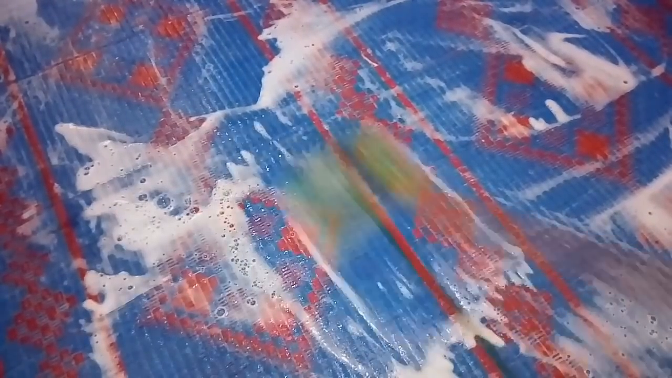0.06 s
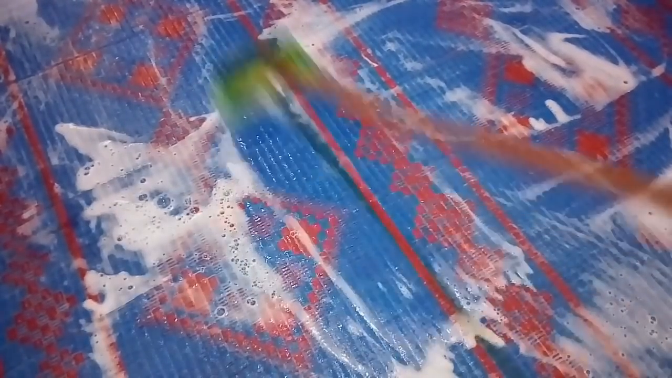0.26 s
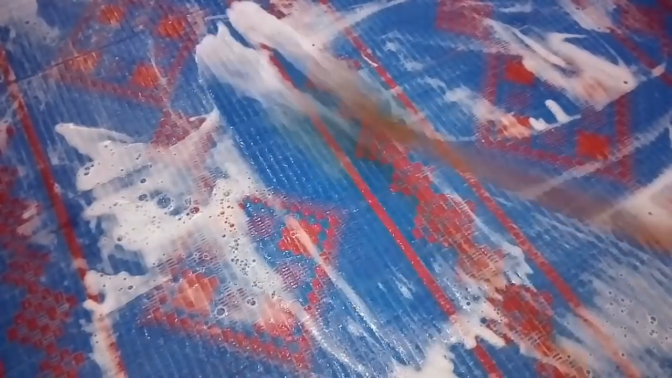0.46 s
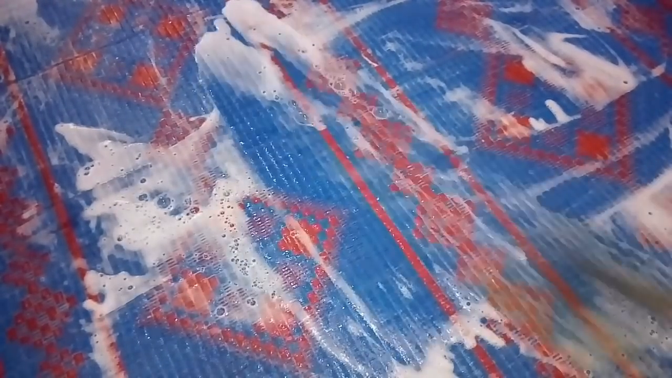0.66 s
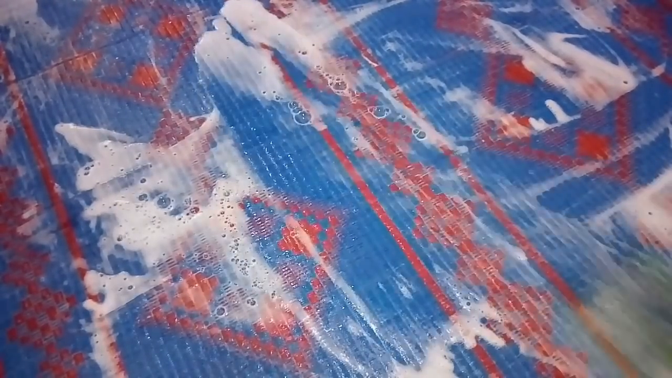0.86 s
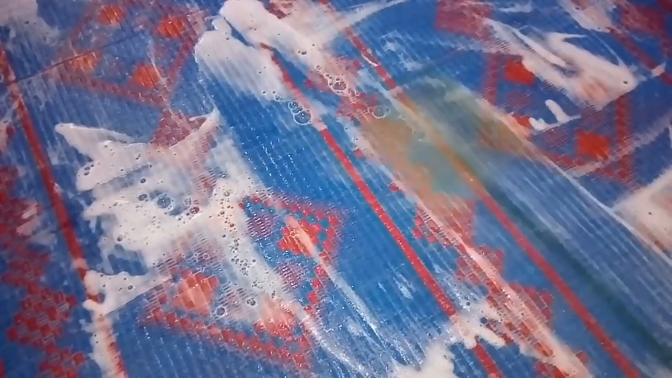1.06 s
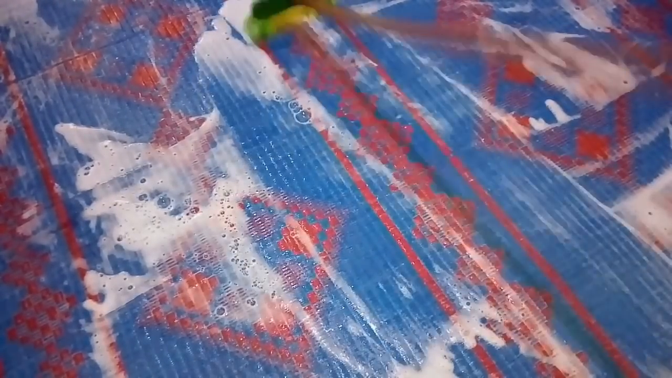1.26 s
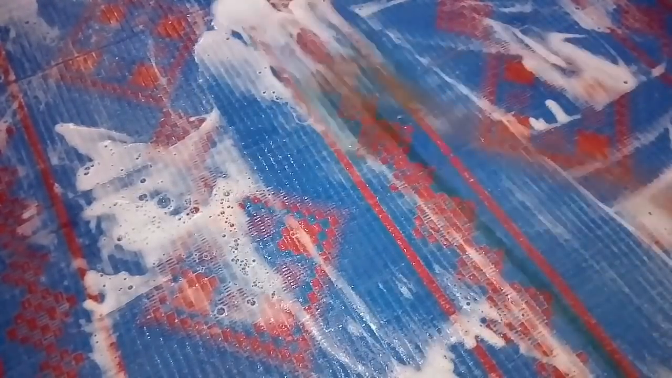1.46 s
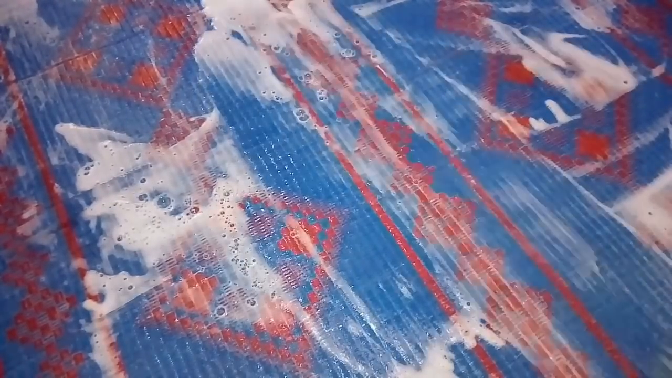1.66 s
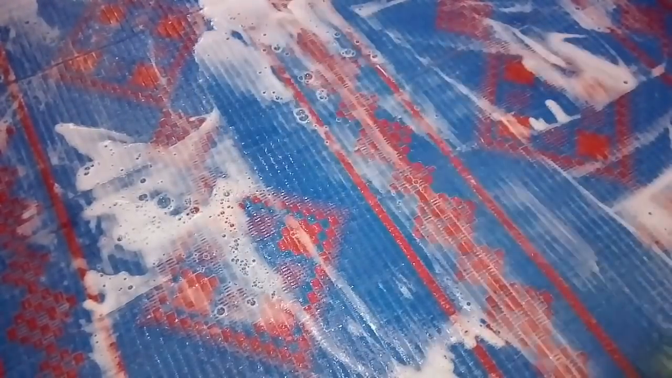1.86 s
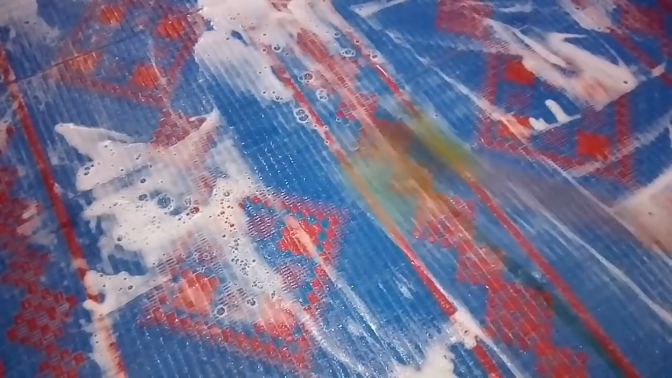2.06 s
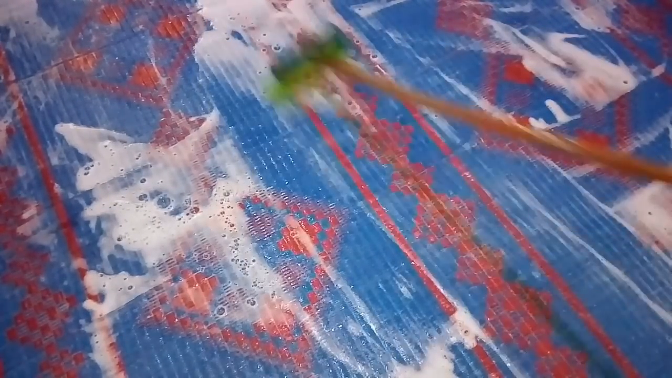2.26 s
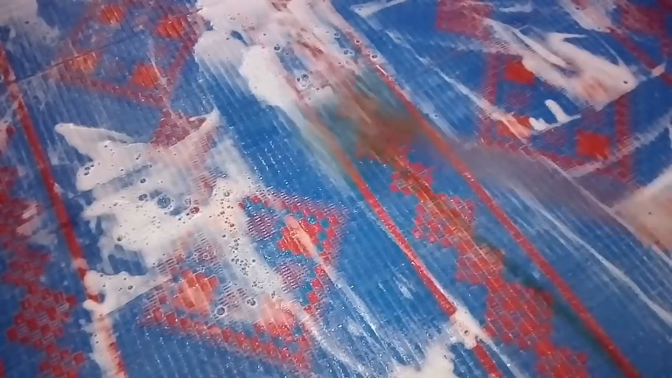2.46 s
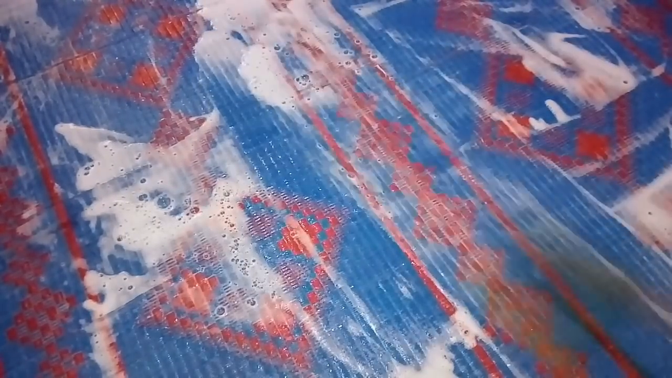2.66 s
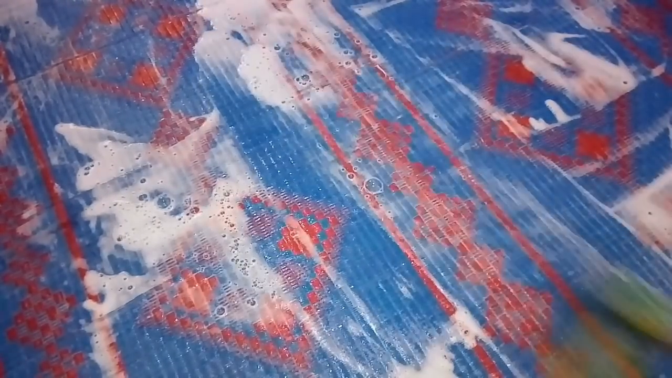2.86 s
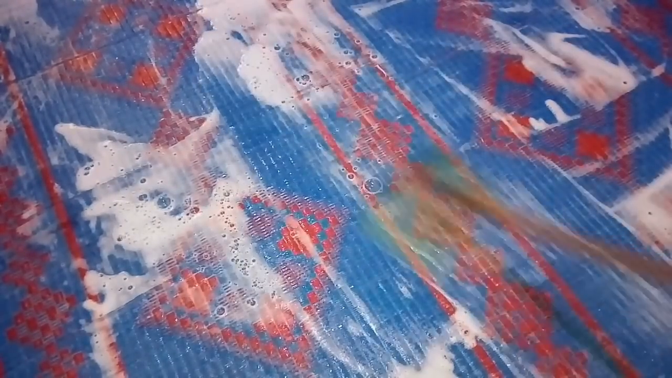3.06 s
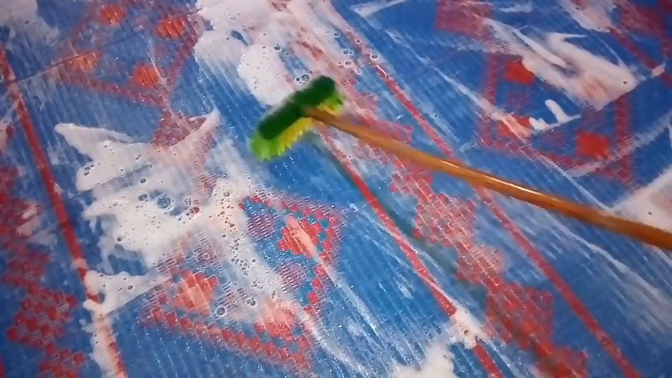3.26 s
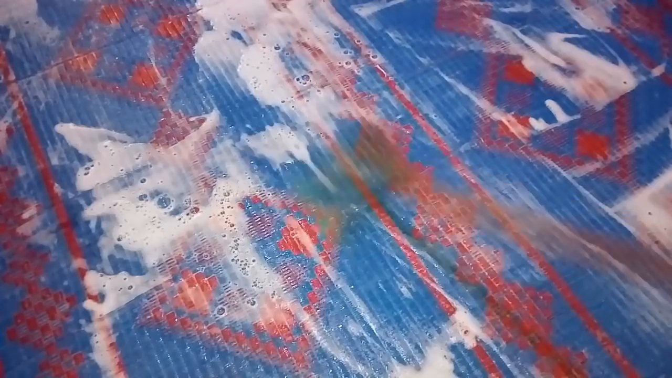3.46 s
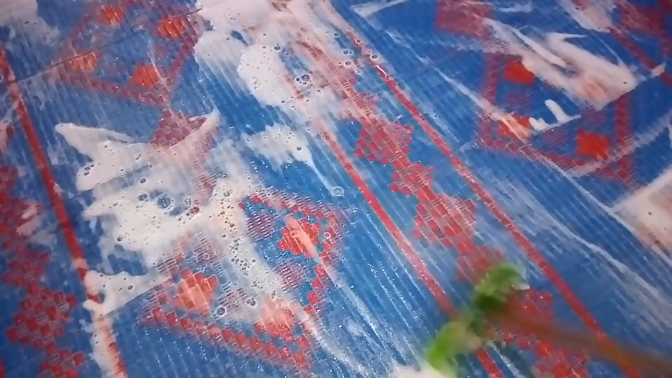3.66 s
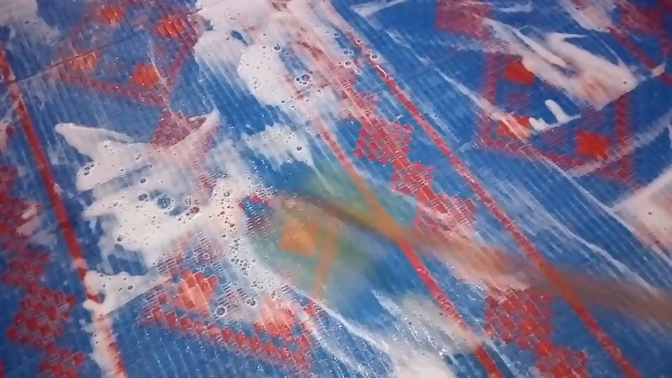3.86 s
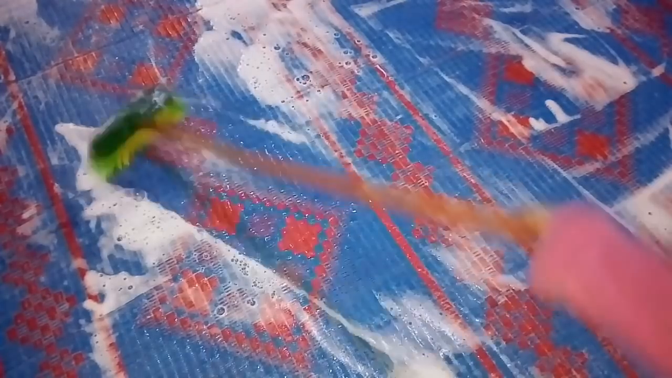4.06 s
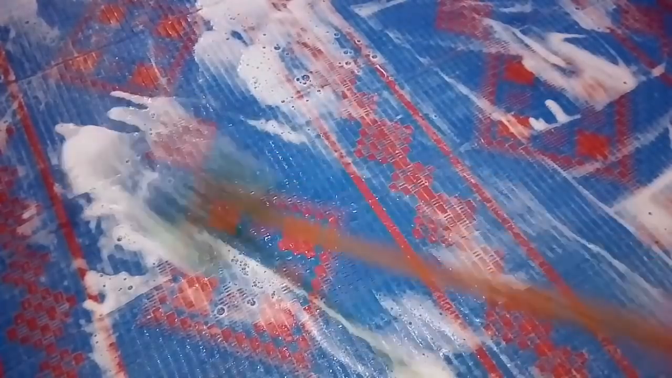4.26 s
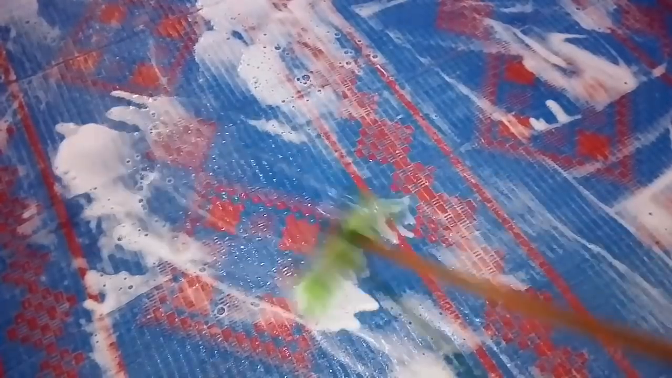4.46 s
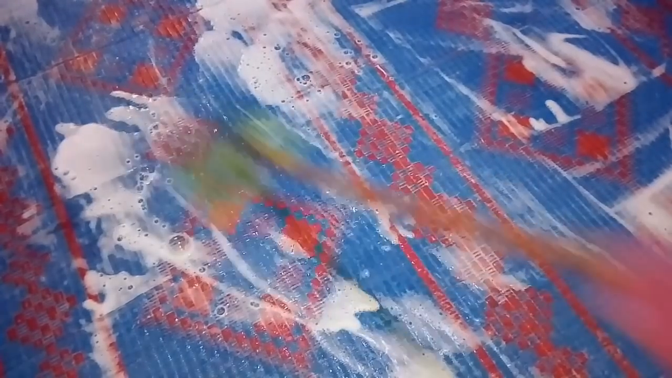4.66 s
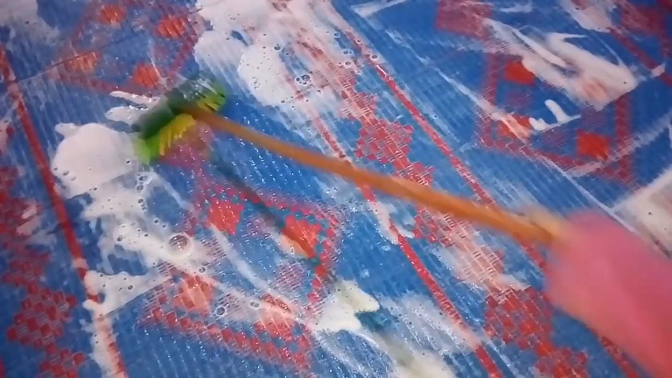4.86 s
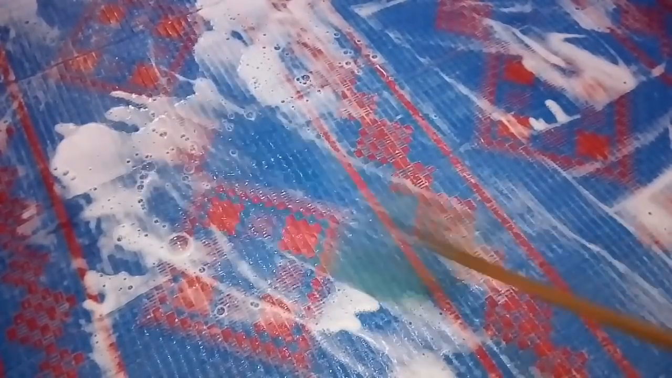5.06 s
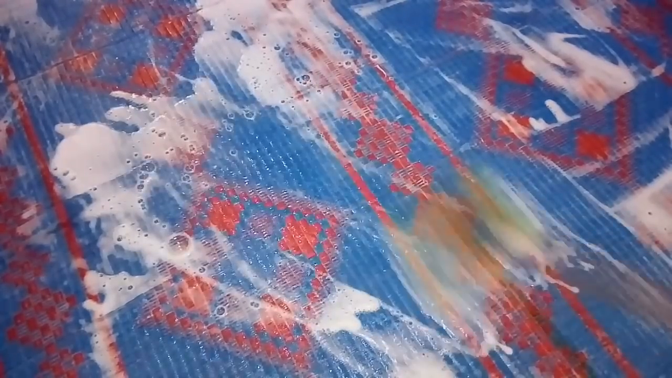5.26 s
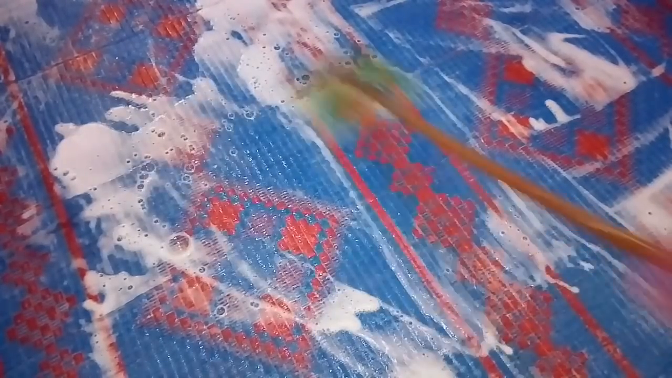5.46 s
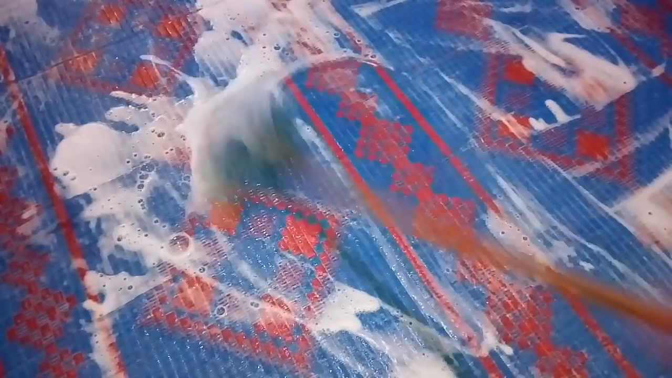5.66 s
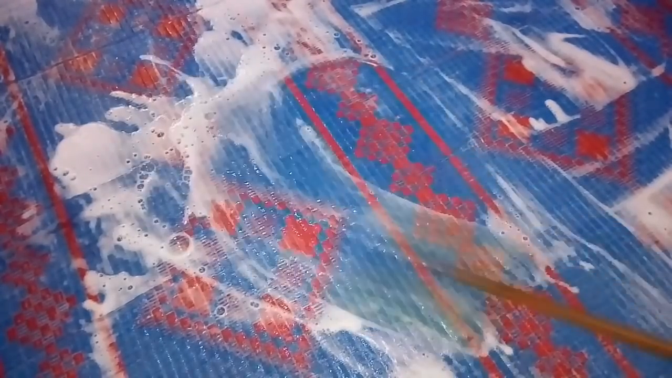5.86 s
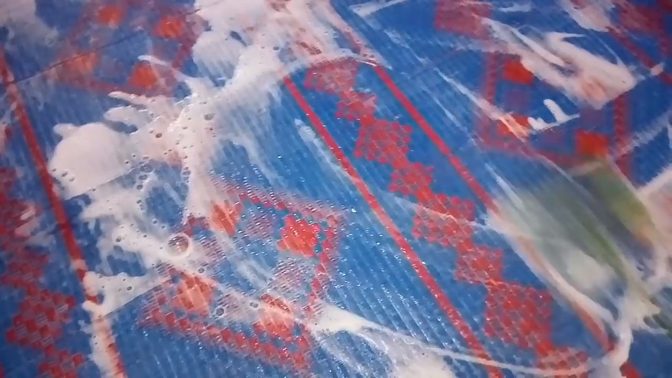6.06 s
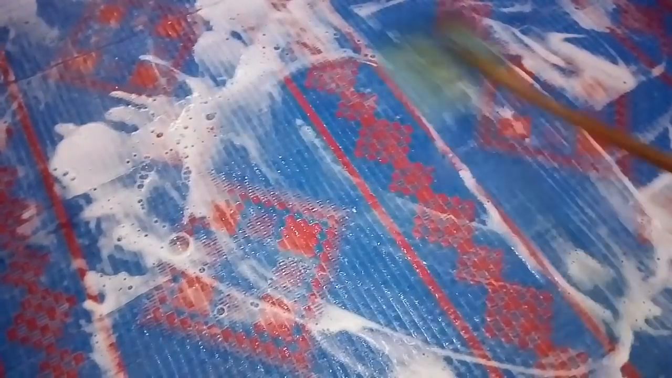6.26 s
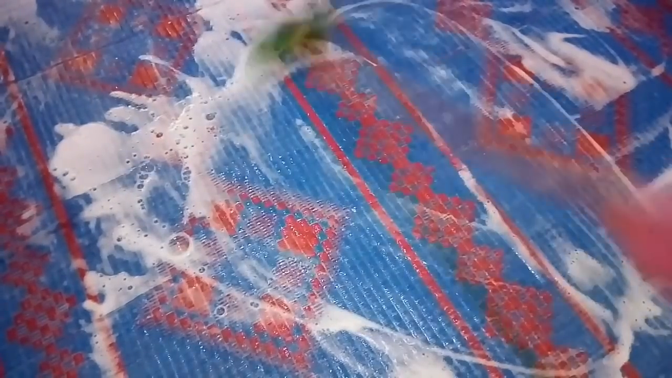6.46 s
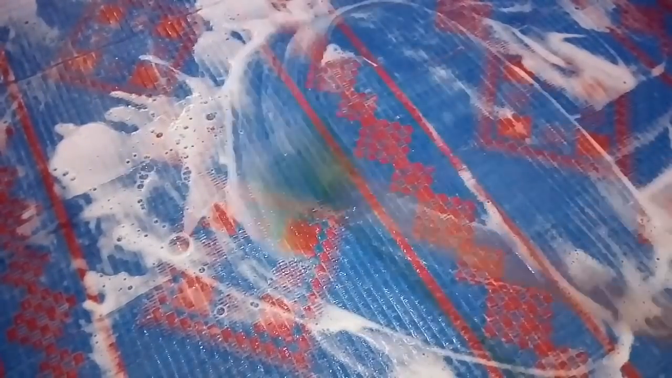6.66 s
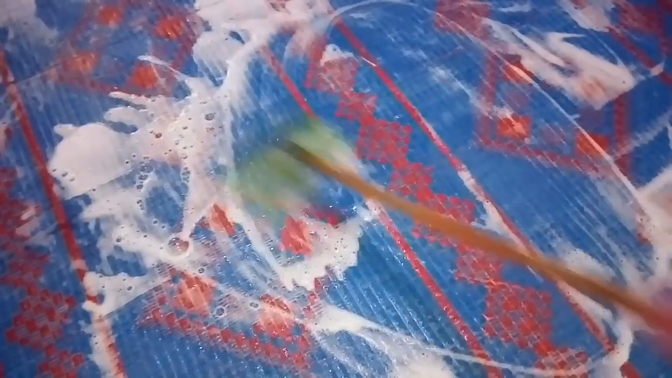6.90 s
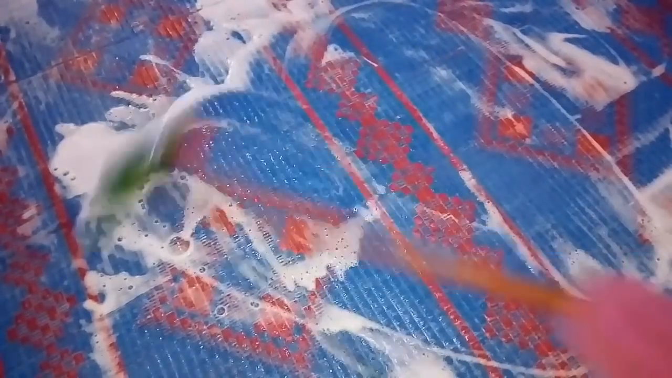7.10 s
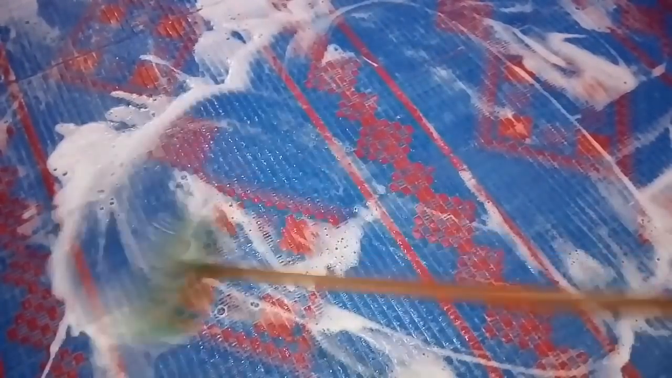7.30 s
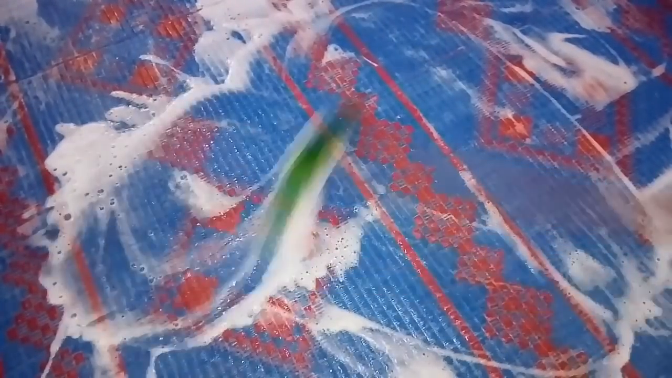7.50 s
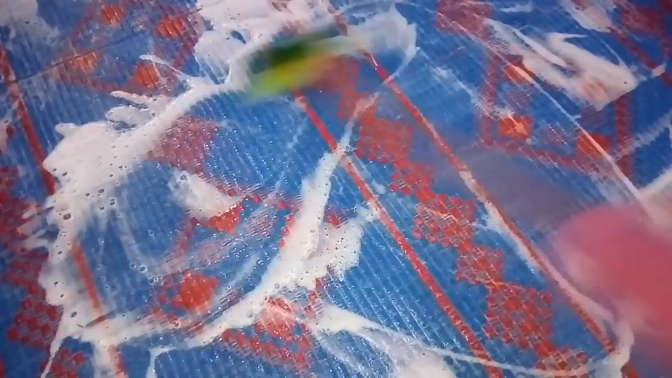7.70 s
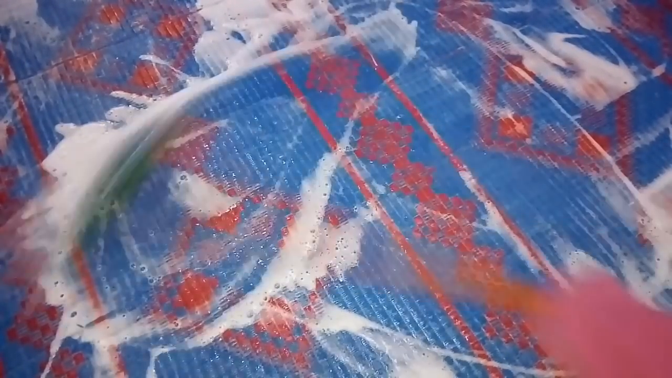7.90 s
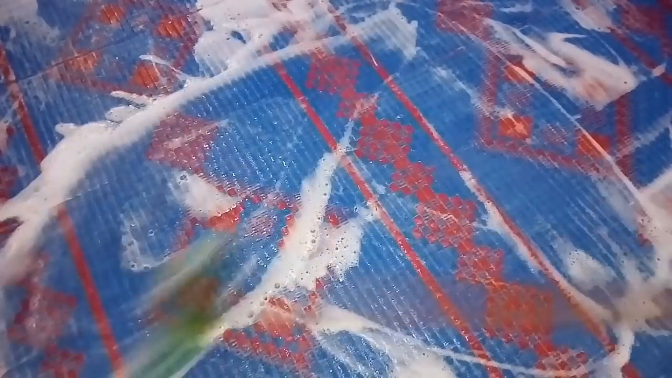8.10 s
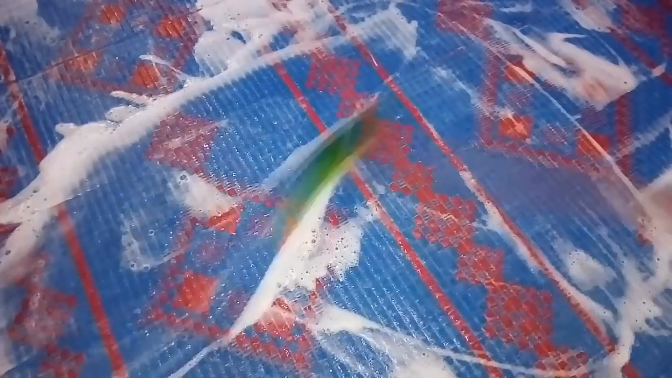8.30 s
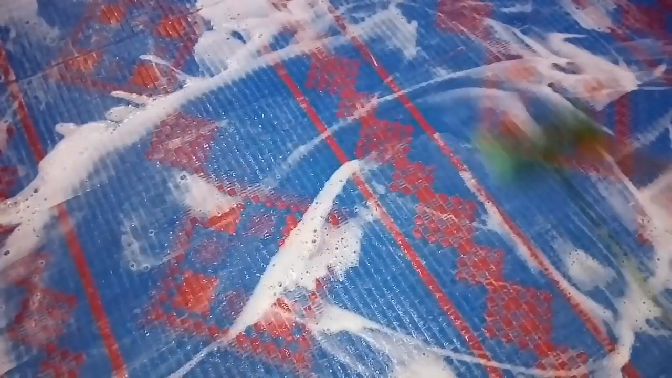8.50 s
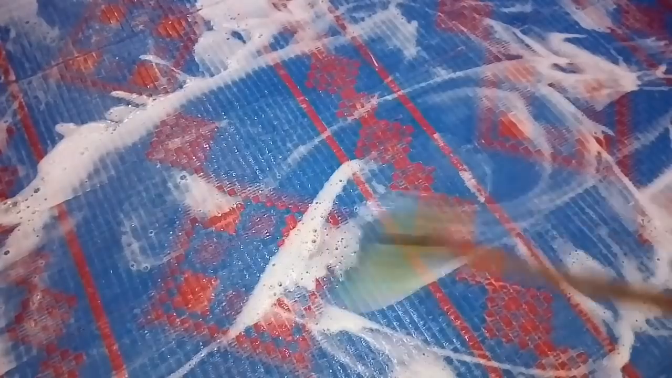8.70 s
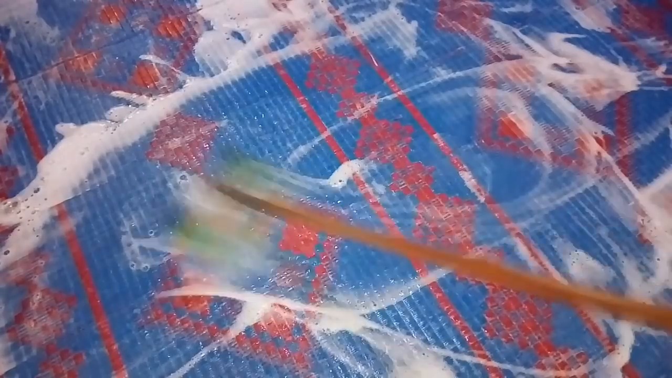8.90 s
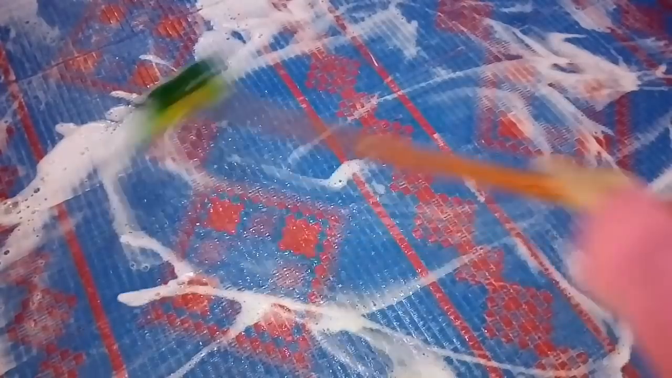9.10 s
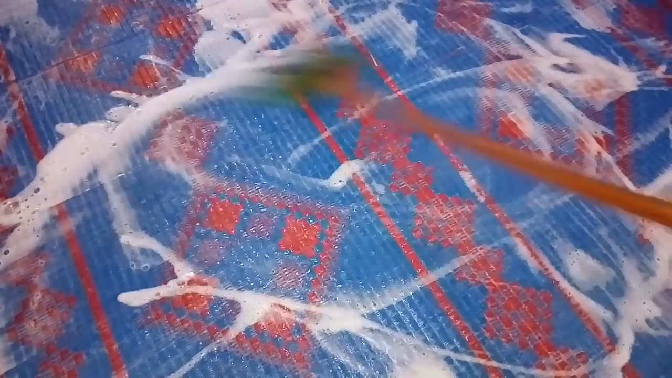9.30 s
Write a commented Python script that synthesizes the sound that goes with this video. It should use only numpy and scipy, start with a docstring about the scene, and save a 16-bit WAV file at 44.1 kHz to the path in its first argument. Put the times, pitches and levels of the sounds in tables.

```python
"""A long-handled brush scours a soapy woven plastic mat, back and forth, in a hard-walled room.
Its bristles hiss and crackle as random snaps, shaped by a spectrum and by the speed of each stroke.
They rasp over the ribs of the weave: resonances excited by snaps, at a pitch that follows the speed.
The pressed mat rustles, the head clacks as decaying modes, and squeaks are brief wavering sines.
Puffs of air buffet the left port as uneven low cycles, over a faint steady background of noise."""
import sys
import numpy as np
from scipy import signal
from scipy.fft import rfft, irfft
from scipy.io import wavfile
from scipy.ndimage import map_coordinates

SR = 44100
rng = np.random.default_rng(int(sys.argv[2]) if len(sys.argv) > 2 else 0)


def log_audio(samples):
    """Write samples as a 16-bit WAV file to the path given in sys.argv[1]."""
    # one column per channel
    frames = np.atleast_2d(samples).T
    # limit to full scale, then quantise
    limited = np.clip(frames, -1, 1)
    pcm = np.round(limited * 32767).astype(np.int16)
    wavfile.write(sys.argv[1], SR, pcm)


N = 411894
T = np.arange(N) / SR
TICKS = T[::100]  # coarse times for slow curves [s]
BINS = np.fft.rfftfreq(N, 1 / SR)  # [Hz]


def amp(db):
    """Decibel law: amplitude ratio of a level."""
    return 10 ** (np.asarray(db) / 20)


def evened(x):
    """Normalisation to an rms of 1."""
    return x / np.sqrt(np.mean(x ** 2) + 1e-20)


def read(points, hz):
    """Interpolation of a spectrum by straight lines over log frequency."""
    f, value = np.transpose(points)
    return np.interp(np.log(hz + 1), np.log(f + 1), value)


def coloured(x, gain):
    """Linear filtering: each frequency is scaled by its gain."""
    return irfft(rfft(x) * gain, N)


def above(hz):
    """High-pass gain of a smooth crossover, one half at hz."""
    return 1 - 1 / (1 + (BINS / hz) ** 4)


def wander(hz):
    """Low-passed noise: slow chance of rms 1, up to about hz."""
    return evened(coloured(rng.standard_normal(N), np.exp(-(BINS / hz) ** 2)))


def ports(pair, likeness):
    """Partial coherence: cross-mixing makes two unrelated signals alike, as at two close ports."""
    turn = np.arcsin(np.clip(read(likeness, BINS), 0, 1)) / 2
    return coloured(pair, np.cos(turn)) + coloured(pair[::-1], np.sin(turn))


def resonate(x, hz, width_hz):
    """Tracking resonance: shift the curve hz down to zero, low-pass steeply, and shift back."""
    turn = np.exp(2j * np.pi * np.cumsum(hz) / SR)
    r = np.exp(-np.pi * width_hz / SR)
    smooth = signal.lfilter([(1 - r) ** 2], [1, -2 * r, r * r], x / turn)
    return (turn * smooth).real


def flicks(per_s, spread_db):
    """Random impulses for each port: a wider spread sets a few large snaps among many small ones."""
    size = amp(spread_db * np.minimum(rng.exponential(1, (2, N)), 4))
    sign = rng.choice([-1., 1.], (2, N))
    happens = rng.random((2, N)) < per_s / SR
    return evened(size * sign * happens)


def bell(s, half):
    """Gaussian swell over TICKS, 1 at its peak."""
    return np.exp(-.5 * ((TICKS - s) / half) ** 2)


def together(sizes):
    """Power addition of overlapping swells (one row each, over TICKS), given at every sample."""
    return np.interp(T, TICKS, np.sqrt(np.sum(np.square(sizes), 0)))


def shared(sizes, values):
    """Power-weighted mean of a property of overlapping swells, given at every sample."""
    weight = np.square(sizes) + 1e-30
    return np.interp(T, TICKS, np.sum(weight * values, 0) / np.sum(weight, 0))


# spectrum of the background: (frequency [Hz], relative level [dB])
AMBIENCE = [(20, 1.5), (50, 5.5), (120, 7), (300, -3), (800, 2), (2000, 10), (6000, -24), (15000, -37)]
# likeness of the two ports in a diffuse field: (frequency [Hz], likeness [0-1])
DIFFUSE = [(50, 0.37), (300, 0.13), (650, 1), (1400, 0.04), (3000, 0)]


def ambience():
    """Diffuse field: faint steady coloured noise, partly alike at the two ports."""
    noise = ports(rng.standard_normal((2, N)), DIFFUSE)
    return amp(-62) * evened(coloured(noise, amp(read(AMBIENCE, BINS))))


# reverberation time of the room: (frequency [Hz], time to fall by 60 dB [s])
ROOM_T60 = [(100, 0.053), (500, 0.71), (2000, 0.23), (6000, 0.16), (9000, 0.16), (15000, 0.14)]


def tail():
    """Exponential decay: sparse reflections for each port, dying at a rate set by their frequency."""
    signs = rng.choice([-1., 1.], (2, N))
    taps = signs * (rng.random((2, N)) < 3000 / SR) * (T > .004)
    hz, t, z = signal.stft(ports(taps, DIFFUSE)[:, :SR], SR, nperseg=256)
    decay = amp(-60 * t / read(ROOM_T60, hz)[:, None])
    echoes = signal.istft(z * decay, SR, nperseg=256)[1]
    return echoes / np.linalg.norm(echoes[0])


def room(x, wet_db, count=3):
    """Convolution: direct sound plus sets of reflections that steadily trade places, as paths change."""
    shares = [np.cos(np.pi * (2.3 * T + k / count)) * np.sqrt(2 / count) for k in range(count)]
    wet = sum(signal.fftconvolve(x * share, tail(), axes=1)[:, :N] for share in shares)
    return (x + amp(wet_db) * wet) / np.sqrt(1 + amp(2 * wet_db))


# strokes, push and pull in turn: (time when fastest [s], speeding up [s], slowing down [s],
# scrubbing relative level [dB], relative levels of the suds' slosh [dB], of the bristles' sizzle [dB]
# and of the tips' fine spray [dB], rasp relative level [dB], ribs crossed per second when fastest [Hz],
# glide over the stroke [octaves], the rasp's octave relative level [dB],
# where the brush stops as lag of the left port [ms])
STROKES = [(.14, 0.5, 0.29, -42, 0, 1.5, 0, -53.5, 766, -0.38, -6, 0.081),
           (.61, 0.26, 0.36, -40.5, -0.5, 0.5, -0.5, -50.5, 1027, 0.27, -4.5, -0.18),
           (1.056, 0.28, 0.35, -39.5, 2, 0, -1, -49, 900, -0.66, -4, 0.093),
           (1.655, 0.4, .19, -40, -1.5, 0.5, -2.5, -49, 1100, 0.1, -6, -0.18),
           (2.045, .31, 0.34, -39, -2, -1.5, 0.5, -48.5, 830, -0.052, -1, 0.082),
           (2.655, 0.28, 0.23, -39.5, -2, -1, -2.5, -55, 915, 0.44, -6, -.16),
           (3.06, 0.31, .28, -40.5, 0, 0, -1, -55, 830, -0.049, -12, 0.043),
           (3.549, 0.18, 0.19, -46.5, 5, 0, 0, -62, 1040, 0.15, -12, -0.0045),
           (3.925, .31, 0.25, -42, 1.5, 1.5, -2, -52.5, 760, -0.46, -1, 0.17),
           (4.3, 0.29, 0.2, -50, 3.5, 0.5, 0.5, -56, 568, -0.24, -4, -0.00022),
           (4.655, 0.31, 0.23, -41, -2.5, -3, -2.5, -58.5, 663, 0.21, 0, 0.2),
           (5.035, 0.26, 0.24, -43, 3, 3.5, -0.5, -54, 770, -0.43, 0, -0.13),
           (5.415, 0.32, 0.28, -41, 1, 0.5, -2.5, -49, 832, -0.11, -13, 0.12),
           (5.875, .42, 0.22, -46.5, 5, 2, 1, -52, 760, .05, -5, -.14),
           (6.21, 0.33, .35, -38.5, -2, -1.5, -3, -49.5, 913, 0.3, -4.5, 0.033),
           (6.64, 0.33, 0.18, -52, 3, -2.5, 1, -60, 645, 0.52, -6, 0.041),
           (6.895, .19, 0.35, -43.5, -2.5, -0.5, -0.5, -63, 730, -0.68, 0, 0.17),
           (7.17, 0.22, 0.47, -56.5, 3.5, 0, 1.5, -64, 479, 0.14, -9, 0.037),
           (7.57, 0.29, 0.33, -48.5, 0.5, 5, 0, -61, 365, .4, -9, 0.12),
           (7.915, .32, 0.22, -47, 1.5, 1, -2.5, -55.5, 550, -0.12, -11, 0.18),
           (8.43, 0.69, 0.35, -50.5, 2.5, 1.5, 1.5, -67.5, 370, 0.9, -10, -0.051),
           (8.93, 0.62, 0.36, -50, 1, 0, 2.5, -63, 677, 0.38, -3, 0.19),
           (9.29, 0.32, 0.3, -54.5, -0.5, -0.5, 2.5, -76, 610, -.05, -3, -0.2)]
LEAD_S = 0.0056  # the motion runs this far ahead of the listed times


def motion():
    """Kinematics: each stroke's progress (-.5 to .5, 0 when fastest) and its speed, a cosine arch."""
    progress = np.array([np.interp(TICKS + LEAD_S, [s - rise, s, s + fall], [-.5, 0, .5])
                         for s, rise, fall, *_ in STROKES])
    return progress, np.abs(np.cos(np.pi * progress))


HISS_POWER = 2.41  # the scrubbing amplitude grows as this power of the speed


def scrubbing():
    """Power law of friction noise: how hard each stroke scrubs over time."""
    _, _, _, level_db, *_ = np.transpose(STROKES)[:, :, None]
    _, speed = motion()
    return amp(level_db) * speed ** HISS_POWER


def travel(pair):
    """Interaural-style delay: the lag between ports shifts as each stroke carries the brush across."""
    s, _, fall, *_, stop_ms = np.transpose(STROKES)
    lag_ms = np.interp(T, s + 0.63 * fall, stop_ms)
    lag = lag_ms * SR / 1000  # samples
    return np.array([map_coordinates(x, [np.arange(N) + side * lag], order=5)
                     for x, side in zip(pair, (-.5, .5))])


# puffs of air: (time of the peak [s], relative level [dB], mean flutter [Hz], Gaussian half length [s],
# break-up into faster eddies [dB])
PUFFS = [(0.621, -50, 84.4, 0.019, -9), (0.693, -33, 74.2, 0.0094, -10), (0.722, -43, 113.5, 0.013, -11),
         (0.776, -46, 94, 0.014, -10), (2.137, -19.5, 97.2, 0.0037, -26), (2.157, -36, 105.5, 0.0094, -16),
         (4.337, -22.5, 117.8, 0.0066, -13), (4.356, -27.5, 118, 0.011, -17),
         (4.392, -28, 151.3, 0.0032, -16), (4.409, -24.5, 151, 0.0065, -6.5),
         (4.421, -17.5, 188.8, 0.003, -21), (4.435, -33, 134, 0.01, -25), (4.8, -25.5, 121.8, 0.0056, -14),
         (4.817, -44, 119, 0.021, -6), (8.75, -52, 74, .015, -3), (8.919, -28.5, 132, 0.012, -16),
         (8.969, -39.5, 107, 0.014, -10.5), (9.049, -41, 100.6, 0.029, -7.5),
         (9.131, -43.5, 98.7, 0.028, -9), (9.254, -56, 73.3, 0.027, -12)]


def puffs():
    """Turbulence: each eddy of air pushes the left port and shakes it for a few uneven cycles."""
    out, t = np.zeros(N), np.arange(-SR // 12, SR // 12) / SR
    unrest, turbulence = np.tanh(wander(hz=260)), wander(hz=516)
    for s, db, hz, half, breakup_db in PUFFS:
        at = np.clip(round(s * SR) + np.arange(len(t)) - len(t) // 2, 0, N - 1)
        cycles = np.cumsum(hz * (1 + 0.35 * unrest[at])) / SR
        phase = 2 * np.pi * (cycles + rng.random())
        swell = np.exp(-.5 * (t / half) ** 2)
        eddies = np.sin(2 * phase) + 0.17 * np.sin(3 * phase) + 0.31 * turbulence[at]
        shake = np.sin(phase) + amp(breakup_db) * swell * eddies + 0.45 * np.sin(phase / 2)
        out[at] += amp(db + 2.5) * swell * shake
    return coloured(out, above(hz=40.7)) * amp([[0], [-42]])


# squeaks of clinging wet bristles: (time [s], relative level [dB], mean pitch [Hz], half length [s])
SQUEAKS = [(7.89, -43, 2440, 0.0087), (7.92, -45, 2480, .015)]


def squeaks():
    """Stick-slip: bristles catch on the wet plastic and sing for a moment, wavering in pitch."""
    waver = np.cumsum(1 + 0.0128 * wander(hz=203)) / SR
    out = np.zeros(N)
    for s, db, hz, half in SQUEAKS:
        swell = amp(db - 4.3 * np.minimum(((T - s) / half) ** 2, 60))
        out += swell * np.sin(2 * np.pi * hz * waver)
    return np.array([out, out])


# knocks of the brush head: (time [s], relative level [dB], factor on the mode frequencies)
CLACKS = [(4.2518, -31.5, 0.98), (4.2586, -45, 1), (6.204, -45, 1), (7.931, -48, 1.7)]
# modes of the brush head: (frequency before that factor [Hz], relative level [dB], 60 dB decay time [s])
HEAD = [(2787, 9, .024), (3230, 10, 0.029), (3700, -5, 0.018), (3940, 6, 0.021), (7060, 6, 0.0057),
        (14900, -16, .004)]


def clacks():
    """Modal decay: the hard head rings briefly, nearer the left port; the wet mat cushions the blow."""
    out = np.zeros(N)
    for s, db, factor in CLACKS:
        t = np.maximum(T[:SR] - (s % 1), 0)
        cushion = 1 - np.exp(-(t / 0.00063) ** 2)
        for hz, mode_db, t60 in HEAD:
            ring = amp(db + mode_db - 60 * t / t60) * np.sin(2 * np.pi * hz * factor * t)
            audible = hz * factor < SR / 2
            out[int(s) * SR:][:SR] += audible * ring * cushion
    return out * amp([[-1], [-8.5]])


# spectrum of the rustling mat: (frequency [Hz], relative level [dB])
MAT = [(40, -31), (120, -18), (200, 2.5), (330, -5), (480, 2.5), (700, 3.5), (1500, -25.5)]
# the brush leans on a loose part, which bellies up: (time [s], Gaussian half length [s],
# relative level [dB], hollow pitch [Hz])
PRESSES = [(0.025, 0.039, -45.5, 310), (1.047, 0.033, -44.5, 294), (1.14, 0.055, -45, 350),
           (3.853, .05, -59.5, 455), (4.01, 0.067, -56, 440), (4.363, 0.084, -55.5, 398),
           (4.6, 0.074, -56.5, 376), (5.338, 0.069, -50, 348), (6.023, 0.065, -51, 232),
           (6.148, 0.072, -44, 464), (7.49, 0.097, -49.5, 350), (8.256, 0.14, -58, 333)]
# likeness of the two ports in the direct sound: (frequency [Hz], likeness [0-1])
DIRECT = [(50, 0.58), (350, 1), (900, 0.21), (2000, 0.17), (6000, 0.43), (10000, 0.077)]
# otherwise it rustles with the scrubbing (dB relative to it) and never quite settles
MAT_DRAG_DB, MAT_REST_DB, MAT_HZ = -23.5, -68.5, 383


def mat():
    """Cavity resonance: the mat rustles on the wet floor and sounds hollow where it bellies up."""
    drag = amp(MAT_DRAG_DB) * scrubbing().sum(0) + amp(MAT_REST_DB)
    pressure = [drag] + [amp(db) * bell(s, half) for s, half, db, _ in PRESSES]
    pitch = shared(pressure, np.array([MAT_HZ] + [hz for *_, hz in PRESSES])[:, None])
    shifts = ports(flicks(per_s=2500, spread_db=3.0), DIRECT)
    rustle = evened(coloured(shifts, amp(read(MAT, BINS))))
    taps = ports(flicks(per_s=2500, spread_db=0.0), DIRECT)
    hollow = evened(resonate(taps, pitch, width_hz=202))
    return coloured(amp(-3.5) * rustle + amp(-7.5) * hollow, above(hz=131)) * together(pressure)


# the tufts grip the weave and the rasp sings out: (time [s], Gaussian half length [s], added level [dB])
GRIPS = [(0.3, 0.053, 8.5), (1.576, 0.013, 10), (2.61, 0.054, 7), (3.65, 0.032, 12), (6.147, 0.065, 7),
         (7.214, 0.071, 10), (7.47, 0.054, 14.5), (7.9, 0.047, 6), (8.254, 0.055, 12)]
RASP_POWER = 2.36  # the rasp's amplitude grows as this power of the speed
RASP_SAG = 0.091  # share by which its pitch drops as the brush comes to rest
RASP_GROWTH_DB = 6.5  # rise over one stroke


def ribs():
    """Periodic excitation: tufts cross ribs out of step, a fuzzy note, its octave and half its pitch."""
    *_, rasp_db, rib_hz, glide, octave_db, _ = np.transpose(STROKES)[:, :, None]
    progress, speed = motion()
    grip_db = sum(db * bell(s, half) for s, half, db in GRIPS)
    force = amp(rasp_db + grip_db + RASP_GROWTH_DB * progress) * speed ** RASP_POWER
    hz = shared(force, rib_hz * 2 ** (glide * progress) * (1 - RASP_SAG * (1 - speed)))
    hz = hz * (1 + .035 * wander(hz=45))
    bumps = ports(flicks(per_s=4000, spread_db=2.5), DIRECT)
    # slow tufts stay in step and hum; fast ones scatter into a wider band
    scatter = np.clip((hz - 500) / 300, 0, 1)
    hum = evened(resonate(bumps, hz, width_hz=122))
    rasp = evened(resonate(bumps, hz, width_hz=173))
    note = amp(-1.9) * (1 - scatter) * hum + amp(1.6) * scatter * rasp
    octave = evened(resonate(bumps, 2 * hz, width_hz=250))
    octave_gain = amp(shared(force, octave_db) + 0.6)
    # strands go over and under, so every second rib is alike
    half = evened(resonate(bumps, hz / 2, width_hz=62))
    return together(force) * (note + octave_gain * octave + amp(-17.5) * scatter * half)


# spectrum of the bristles: (frequency [Hz], relative level per Hz [dB])
BRISTLES = [(150, -18), (400, -30.5), (700, -5), (1100, -1.5), (1700, -1), (2700, -0.5), (3600, -1.5),
            (4400, -2), (6000, -0.6), (7000, -6.5), (8200, -16), (11000, -18), (13800, -19), (14500, -10.5),
            (15500, -12.5)]
# the bristles dig in abruptly: (onset [s], relative level [dB], extra spray [dB])
BITES = [(.02, -38, 0), (0.931, -48, 7.5), (1.385, -49, 2), (1.68, -41, -1), (1.96, -39, 2),
         (2.941, -38, 2), (3.79, -42, 4), (4.26, -54, 0), (4.485, -44.5, -5), (5.32, -54, 6),
         (6.18, -40.5, 5), (6.81, -45.5, -4)]
BITE_RISE_S, BITE_DECAY_S = 0.011, 0.096
REST_DB = -62  # wet bristles still fizz at the turns (relative level)
SLOSH_GROWTH_DB, SPRAY_GROWTH_DB = 0.5, -4  # change over one stroke, as suds gather in the bristles
SIZZLE_SPEED_DB, SPRAY_SPEED_DB = 5, -1  # change from rest to full speed


def bristles():
    """Friction noise: dense snaps clump as tufts catch and let go; tips spray early, suds slosh late."""
    _, _, _, _, slosh_db, sizzle_db, spray_db, *_ = np.transpose(STROKES)[:, :, None]
    bite_s, bite_db, bite_spray_db = np.transpose(BITES)[:, :, None]
    progress, speed = motion()
    force = scrubbing()
    since = np.maximum(TICKS - bite_s, 0)
    bites = np.minimum(since / BITE_RISE_S, 1) * np.exp(-since / BITE_DECAY_S)
    level = np.hypot(together([*force, *(amp(bite_db) * bites)]), amp(REST_DB))

    clumping = amp(0.63 * wander(hz=121) + 0.22 * wander(hz=25))
    clicks = flicks(per_s=12000, spread_db=2.0) * clumping
    hiss = evened(coloured(ports(clicks, DIRECT), amp(read(BRISTLES, BINS))))

    # four bands, from low to high: slosh, scratch, sizzle, spray
    slosh = coloured(hiss, 1 - above(hz=2160))
    spray = coloured(hiss, above(hz=6970))
    sizzle = coloured(hiss, above(hz=4000)) - spray
    scratch = hiss - slosh - sizzle - spray

    sloshing_db = shared(force, slosh_db + SLOSH_GROWTH_DB * progress)
    slosh_gain = amp(sloshing_db - 1.5 + 0.54 * wander(hz=22))
    scratch_gain = amp(0.8 + 1.3 * wander(hz=30))
    sizzle_gain = amp(shared(force, sizzle_db + SIZZLE_SPEED_DB * (speed - 1)) - 0.2)
    spraying_db = spray_db + SPRAY_GROWTH_DB * progress + SPRAY_SPEED_DB * (speed - 1)
    spraying_db = spraying_db + np.sum(bite_spray_db * bites, 0)
    spray_gain = amp(shared(force, spraying_db) - 3.5)
    bands = slosh * slosh_gain + scratch * scratch_gain + sizzle * sizzle_gain + spray * spray_gain
    return amp(2.5) * level * bands


# balance of the brush between the ports: (frequency [Hz], left minus right [dB])
LEFT_BIAS = [(200, 1.5), (1200, 0), (2400, -1), (4400, 0), (8000, 4), (15000, 4.5)]


def scene():
    """Superposition: the brush in its room, the puffs and the background add up."""
    contact = bristles() + ribs() + mat() + clacks() + squeaks()
    brush = room(travel(contact), wet_db=-7.5)
    sides = amp(read(LEFT_BIAS, BINS) * np.array([[.5], [-.5]]))
    return coloured(brush, sides) + puffs() + ambience()


EDGE_HZ = 15600


def record(dry):
    """Band limiting: a steep low-pass filter removes what lies above the edge."""
    lowpass = signal.firwin(511, EDGE_HZ, window=("kaiser", 9), fs=SR)
    return signal.oaconvolve(dry, lowpass[None], "same")


dry = scene()
out = record(dry)
log_audio(out)
```